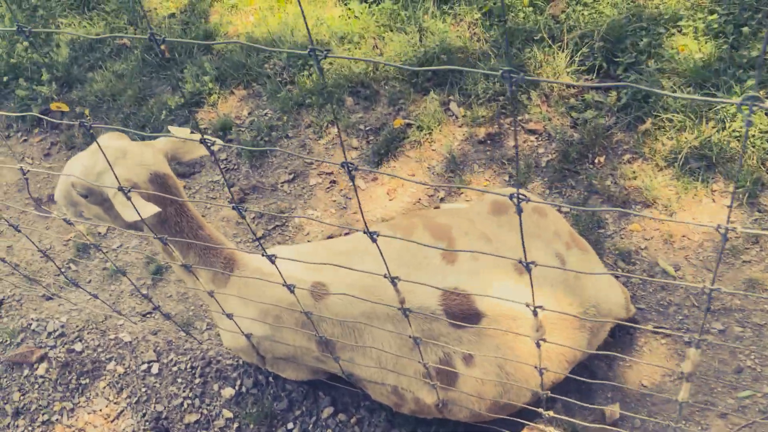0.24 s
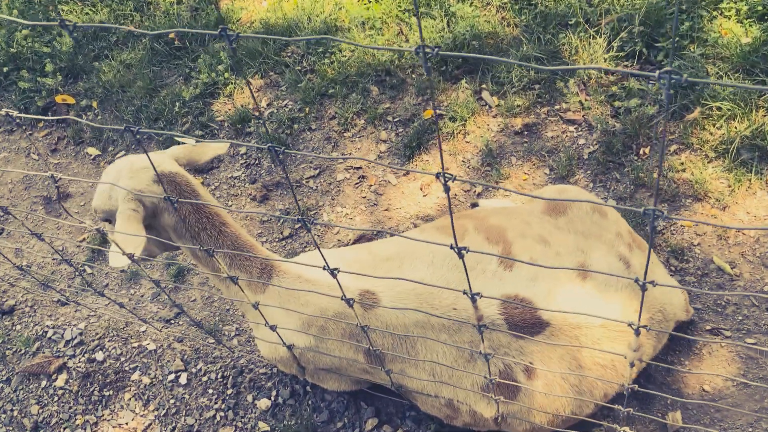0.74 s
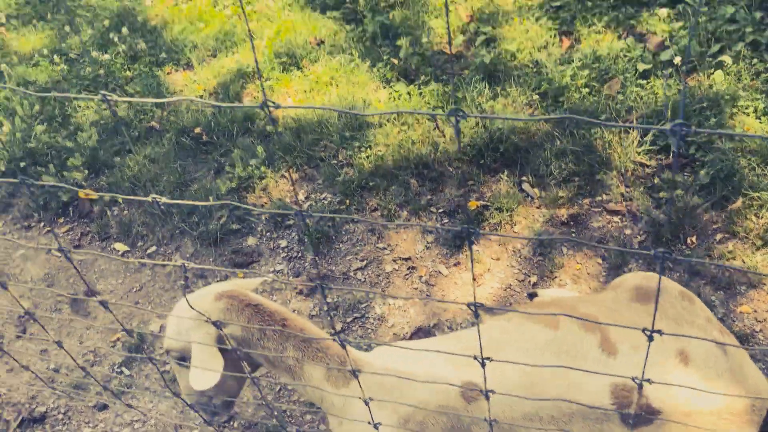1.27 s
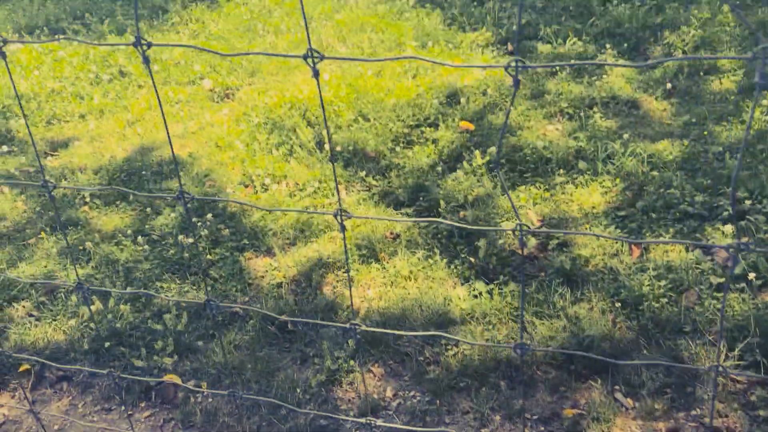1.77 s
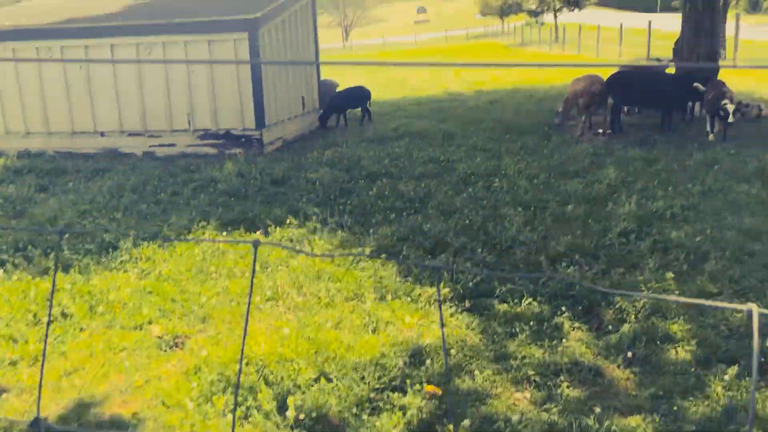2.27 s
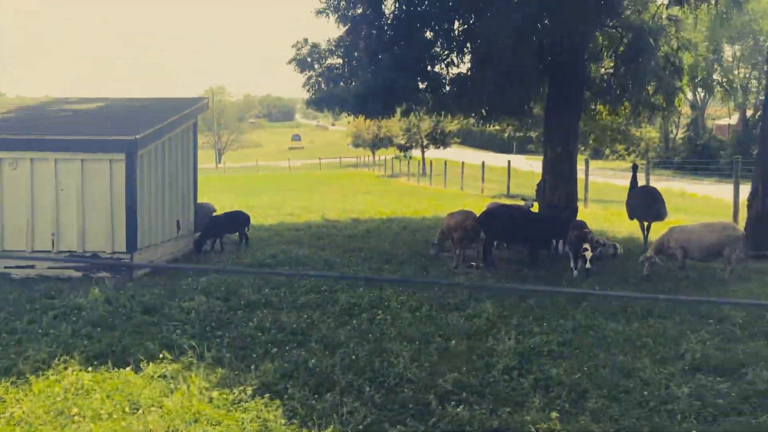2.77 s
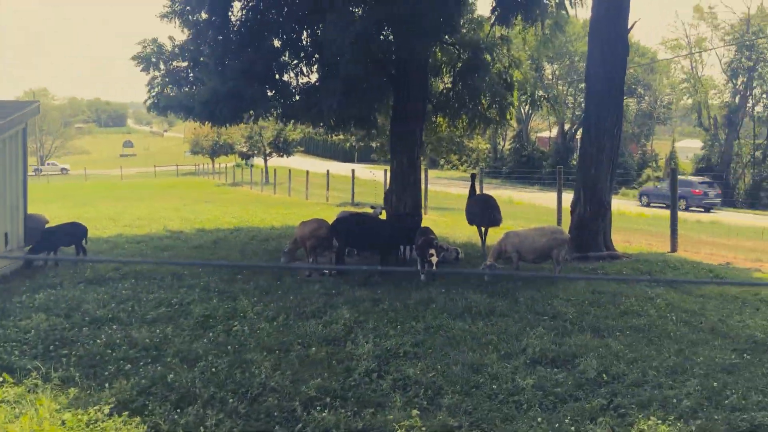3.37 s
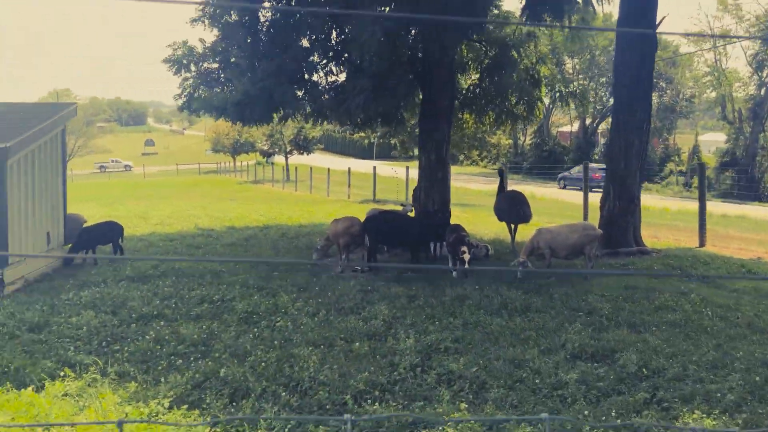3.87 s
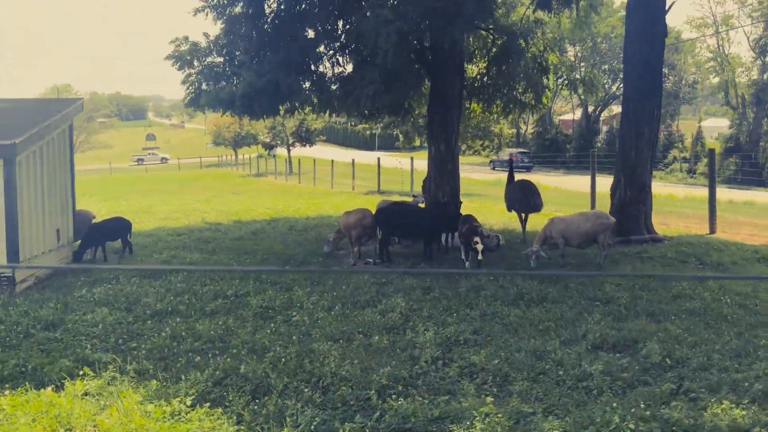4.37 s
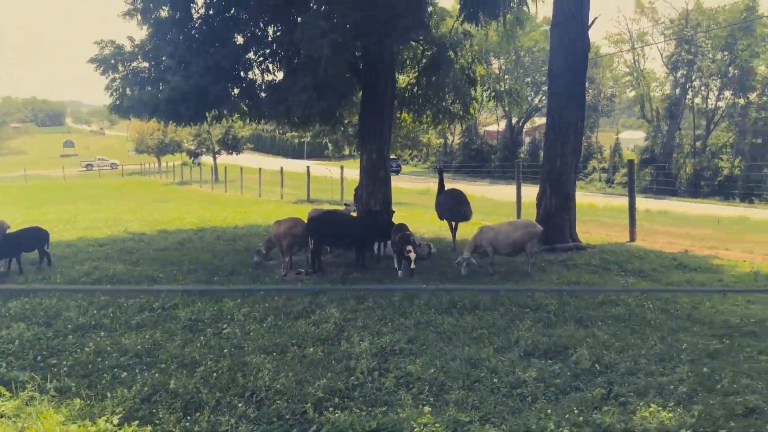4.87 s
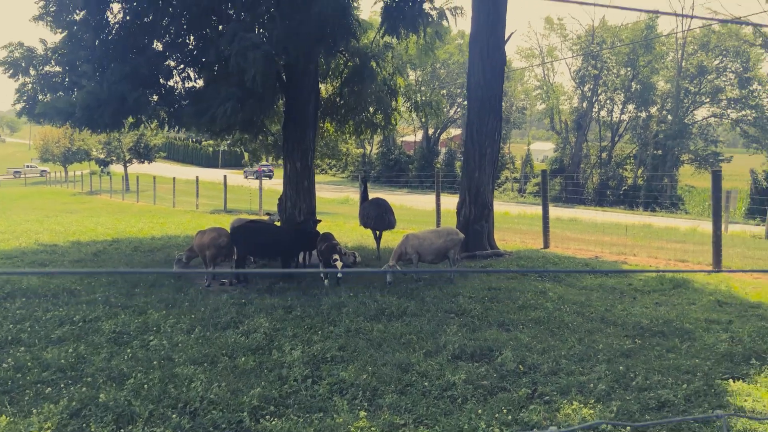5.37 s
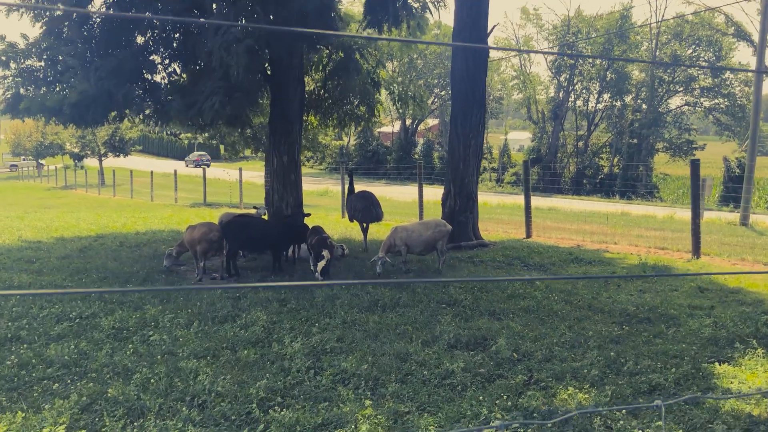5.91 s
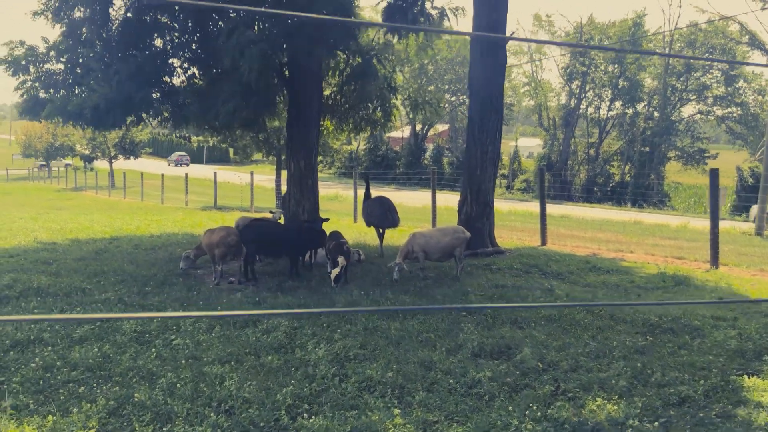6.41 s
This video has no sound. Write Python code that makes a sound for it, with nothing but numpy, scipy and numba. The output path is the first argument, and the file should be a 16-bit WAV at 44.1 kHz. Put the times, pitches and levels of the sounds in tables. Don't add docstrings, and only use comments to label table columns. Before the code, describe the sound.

Tyre roar and falling engine hum from a country road, wind rumbling on the microphone, then one loud, shaky, nasal sheep bleat.

```python
import sys
import numpy as np
from scipy import signal
from scipy.fft import rfft, irfft
from scipy.io import wavfile
from numba import njit

SR = 44100
rng = np.random.default_rng(int(sys.argv[2]) if len(sys.argv) > 2 else 0)


def transcribe(u):
    v = np.clip(np.atleast_2d(u).T, -1, 1)
    q = np.round(v * 32767).astype(np.int16)
    wavfile.write(sys.argv[1], SR, q)


def gain_from_db(level_db):
    decades = np.asarray(level_db, float) / 20
    return 10 ** decades


N = 293204


def rms_one(x):
    return x / np.sqrt(np.mean(x ** 2) + 1e-20)


def in_time(rows):
    s, *columns = np.transpose(rows)
    return [np.interp(np.arange(N) / SR, s, column) for column in columns]


def drift(rate):
    r = np.exp(-80 * np.pi * rate / SR)
    noise = rng.standard_normal(N // 40 + 2002)
    slow = signal.lfilter([1], [1, -2 * r, r * r], noise)[2000:]
    return np.interp(np.arange(N) / 40, np.arange(len(slow)), rms_one(slow))


def coloured(points):
    hz, db = np.transpose(points)
    bins_hz = np.maximum(np.arange(N // 2 + 1) * SR / N, 1)
    shape = gain_from_db(np.interp(np.log(bins_hz), np.log(hz), db, left=-90, right=-90))
    return rms_one(irfft(rfft(rng.standard_normal(N)) * shape, N))


def swells(rows, floor_db):
    t = np.arange(N) / SR
    power = gain_from_db(2 * floor_db)
    for middle_s, db, half_s in rows:
        power = power + gain_from_db(2 * db) * np.exp(-2 * ((t - middle_s) / half_s) ** 2)
    return np.sqrt(power)


@njit
def moving_resonance(x, turn, r):
    y = np.zeros(len(x))
    for i in range(2, len(x)):
        y[i] = (1 - r * r) / 2 * (x[i] - x[i - 2]) + 2 * r * np.cos(turn[i]) * y[i - 1] - r * r * y[i - 2]
    return y


def sheep():
    # t/s, effort level/dB, brightness/dB, resting pitch f/Hz, main throat resonance f/Hz
    bleat = [(3.33, -26, -20, 182.4, 2720), (3.385, -23.5, -14, 170.5, 2970),
             (3.44, -21.5, -10, 173.7, 3044), (3.58, -23.5, -5, 185.5, 2754),
             (3.81, -27, -1.5, 194.5, 2608), (4.12, -24, -3, 193.9, 2630), (4.25, -21.5, -7, 184.6, 2900),
             (4.305, -20, -11, 176.2, 3025), (4.335, -23.5, -10, 171.4, 3400)]
    # t/s, pitch lift/share
    quaver = [(3.33, .05), (3.402, .2), (3.473, .2), (3.545, .19), (3.623, .17), (3.694, .14), (3.771, .14),
              (3.843, .08), (3.916, .06), (3.982, .05), (4.042, .05), (4.092, .06), (4.155, .14),
              (4.233, .1), (4.301, .2), (4.37, .05)]
    # f/Hz, width/Hz, level/dB, polarity/signed gain
    mouth = [(4450, 470, -16.5, 1), (5700, 5500, -17, 0.93), (7010, 1100, -8.5, -1.3),
             (8120, 230, -8.5, 0.77), (9700, 1320, -15, -0.77), (13400, 3600, -30, -1.1)]
    t = np.arange(N) / SR
    effort_db, bright_db, rest_hz, main_hz = in_time(bleat)

    push_s, lifts = np.transpose(quaver)
    turn = 2 * np.pi * np.interp(t, push_s, np.arange(len(push_s)))
    lift = np.interp(t, push_s, lifts)
    push = lift * np.exp(2.2 * (np.cos(turn) - 1))
    snap = lift * np.exp(3 * (np.cos(turn - 1.2) - 1))
    slump = lift * np.exp(3 * (np.cos(turn - 2.5) - 1))
    since_snap = (turn - .7) / (2 * np.pi) % 1
    glow = lift * (.3 - 1.3 * since_snap ** 2.5)

    cycles = np.cumsum(rest_hz * (1 + push + .009 * drift(60))) / SR
    closing = np.diff(np.floor(cycles), prepend=0)
    pulses = -closing * gain_from_db(1.0 * rng.standard_normal(N))
    air = gain_from_db(-28) * rng.standard_normal(N) * np.exp(-3.0 * (cycles % 1))

    onset_s, end_s, attack_db_per_s, release_db_per_s = 3.388, 4.335, 700, 700
    edge_db = np.minimum(attack_db_per_s * (t - onset_s), release_db_per_s * (end_s - t))
    edge_db = np.clip(edge_db, -200, 0)
    catch = gain_from_db(-12.5) * np.exp(-((t - 3.33) / .018) ** 2)
    effort = (gain_from_db(edge_db) + catch) * gain_from_db(effort_db + 32 + 16 * snap - 28 * slump)
    low = (pulses + .36 * air) * effort + 1e-18
    high = (pulses + air) * effort + 1e-18

    def through(x, hz, width, sag):
        return moving_resonance(x, 2 * np.pi * hz * (1 - sag * push) / SR, np.exp(-np.pi * width / SR))

    voice = gain_from_db(-9 + 20 * push) * through(low, 940, 90, sag=.5)
    second = through(low, 2140, 190, sag=.65)
    voice += gain_from_db(17) * through(second, main_hz, 190, sag=.75)
    voice -= gain_from_db(-15.5) * through(high, main_hz + 700, 450, sag=.4)
    for hz, width, db, polarity in mouth:
        follow = min(hz / 7000, 1.5)
        gain = polarity * gain_from_db(db + follow * (bright_db + 40 * glow))
        once = through(high, hz, width, sag=.12)
        voice += gain * through(once, hz, width, sag=.12)
    echo = gain_from_db(-18) * np.roll(voice, round(.031 * SR))
    return voice + echo


def engine():
    # t/s, f/Hz, level/dB
    firing = [(0.05, 188.6, -52), (0.23, 186.9, -46), (0.7, 186.7, -45), (1.38, 184.7, -35),
              (2.08, 181.8, -39.5), (2.35, 179.2, -33), (2.6, 176, -37.5), (2.78, 176.7, -33.5),
              (3.0, 173.8, -34.5), (3.24, 172, -30.5), (3.32, 171.3, -38.5), (3.55, 166.7, -32.5),
              (3.68, 164.4, -41), (3.82, 163.3, -35.5), (4.55, 159, -44), (4.75, 159.6, -41),
              (5.4, 157.8, -47), (6.5, 157.5, -48.5)]
    # multiple of the firing note, width/Hz, level/dB
    orders = [
        (0.502, 8.8, -13.5),
        (0.874, 6.8, -12),
        (1.35, 4, -14.5),
        (2.0, 36, -55.5),
    ]
    hz, db = in_time(firing)
    turn = 2 * np.pi * hz / SR
    phase = np.cumsum(turn) + 0.39 * drift(19.5)
    note = np.sqrt(2) * np.sin(phase) * gain_from_db(1.7 * drift(9.8))
    for multiple, width, order_db in orders:
        r = np.exp(-np.pi * width / SR)
        rough = moving_resonance(rng.standard_normal(N), multiple * turn, r)
        note += gain_from_db(order_db) * rms_one(rough)
    return gain_from_db(db) * note


def traffic():
    # closest at t/s, time to drive its closest distance/s, hiss level/dB, exhaust level/dB
    passes = [
        (.5, 0.26, -55.5, -65),
        (3.0, 0.68, -48.5, -40.5),
        (5.6, 1, -54, -57),
        (6.9, 0.6, -57.5, -55),
    ]
    t = np.arange(N) / SR
    closest_s, reach_s, *levels_db = np.transpose(passes)
    near = (1 + ((t[:, None] - closest_s) / reach_s) ** 2) ** -1.455
    return [np.sqrt(near @ gain_from_db(2 * db)) for db in levels_db]


def exhaust_drone(passing):
    # f/Hz, level/dB per Hz
    colour = [(180, 7.5), (260, 0), (400, 1), (600, 1), (900, -1.5)]
    gain = np.hypot(passing, gain_from_db(-57))
    return gain * gain_from_db(0.59 * drift(3.57)) * coloured(colour)


def tyre_roar():
    # t/s, level/dB
    roar = [(0, -45), (.8, -43), (1.4, -40), (1.8, -42.5), (2.4, -40.5), (3.5, -41), (4.8, -39.5),
            (5.6, -42.5), (6.3, -41.5), (6.65, -42)]
    # f/Hz, level/dB per Hz
    colour = [(400, -35.5), (600, -9.5), (850, 4.5), (1200, 2), (1700, -3.5), (2400, -9), (4000, -19),
              (8000, -34)]
    db, = in_time(roar)
    return gain_from_db(db + 0.56 * drift(4.7)) * coloured(colour)


def field_hiss(passing):
    # f/Hz, level/dB per Hz
    colour = [(1200, 4.5), (2200, 1.5), (4000, 4.5), (6500, -1.5), (10000, -10.5), (16000, -36)]
    return passing * gain_from_db(1.4 * drift(7.5)) * coloured(colour)


def wind_rumble():
    # middle t/s, peak level/dB, half length/s
    puffs = [(0, -36, 0.063), (.45, -42, 0.19), (.9, -41, 0.086), (1.55, -45.5, 0.37), (2.15, -40.5, 0.14),
             (2.87, -37, 0.07), (3.3, -32, 0.11), (3.85, -36, 0.3), (5.2, -44, 0.19), (5.46, -44, 0.1),
             (5.85, -45, .08), (6.09, -44.5, 0.055), (6.33, -42.5, 0.044), (6.52, -49, 0.028)]
    # f/Hz, level/dB per Hz
    colour = [(20, -65), (32, -19), (50, -1), (80, -1), (130, -1), (200, -5), (280, -15), (400, -48)]
    return swells(puffs, floor_db=-46.5) * gain_from_db(2.0 * drift(3.1)) * coloured(colour)


def wind_bumps():
    # t/s, peak level/dB, f/Hz, length/s
    bumps = [
        (.008, -27, 230, .02),
        (1.57, -30, 140, .04),
        (3.26, -25, 120, .04),
        (3.6, -20, 140, .022),
        (5.455, -28, 110, .02),
    ]
    t = np.arange(N) / SR
    total = np.zeros(N)
    for s, db, hz, length in bumps:
        total += gain_from_db(db) * np.exp(-((t - s) / length * 2) ** 2) * np.cos(2 * np.pi * hz * (t - s))
    return total


def leaves():
    # middle t/s, peak level/dB, half length/s
    gusts = [(.1, -67, 0.15), (.6, -66, 0.23), (.88, -57, .13), (1.15, -63, 0.2), (1.6, -63, 0.27),
             (1.86, -55, 0.14), (2.2, -63, 0.53), (2.85, -57.5, 0.34), (3.2, -64, 0.24), (5.7, -68, 0.54),
             (6.2, -67, 0.097),
             (3.95, -56, .28),
        (3.45, -64, .2),
    ]
    # f/Hz, level/dB per Hz
    colour = [(2500, -56), (5000, 2.5), (9000, 3), (13000, 2.5), (17000, -1.5)]
    return swells(gusts, floor_db=-72) * gain_from_db(1.2 * drift(24.0)) * coloured(colour)


def stalks():
    # t/s, peak level/dB
    ticks = [
        (1.05, -45),
        (1.11, -44),
        (1.161, -42),
        (1.217, -36),
    ]
    t = np.arange(N) / SR
    shape = np.zeros(N)
    for s, db in ticks:
        shape += gain_from_db(db) * (t > s) * np.exp(-np.maximum(t - s, 0) / .002)
    treble = signal.butter(2, 11000, "high", fs=SR, output="sos")
    return signal.sosfilt(treble, shape * rng.standard_normal(N)) / 2


def scene():
    hiss, exhaust = traffic()
    road = engine() + exhaust_drone(exhaust) + tyre_roar() + field_hiss(hiss)
    wind = wind_rumble() + wind_bumps() + leaves() + stalks()
    return (sheep() + road + wind)[None]


def strongest_tones(stretch, count):
    spectrum = rfft(stretch)
    hz = np.arange(len(spectrum)) * SR / len(stretch)
    height = np.abs(spectrum) * np.clip(hz / 1000, 1, 5) ** .6 * (hz < 6800)
    kept = height >= np.sort(height)[-count]
    return irfft(spectrum * kept * np.clip(hz / 1500, 1, 2), len(stretch))


def low_pass(x):
    return signal.sosfilt(signal.butter(12, 16330, fs=SR, output="sos"), x)


def record(dry):
    # middle t/s, flat length/s, tones kept
    dropouts = [(.092, .0, 40), (.199, .0, 40), (.262, .0, 40), (.347, .0, 40), (.39, .0, 40),
                (2.845, .0, 50), (2.886, .0, 30), (3.1, .0, 25), (4.339, .0, 45), (4.913, .0, 40),
                (6.001, .0, 45), (6.385, .0, 50), (6.449, .0, 50), (6.588, .018, 80)]
    x = dry[0].copy()
    fade = np.hanning(1024)
    for s, length, count in dropouts:
        weight = np.r_[fade[:512], np.ones(round(length * SR)), fade[512:]]
        start = round(s * SR) - len(weight) // 2
        part = slice(start, start + len(weight))
        x[part] += weight * (strongest_tones(x[part], count) - x[part])
    x = signal.sosfilt(signal.cheby2(16, 50, 16050, fs=SR, output="sos"), x)
    return low_pass(x[None])


dry = scene()
out = record(dry)
transcribe(out)
```